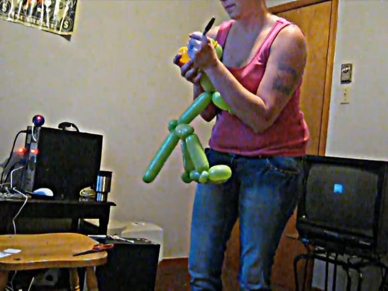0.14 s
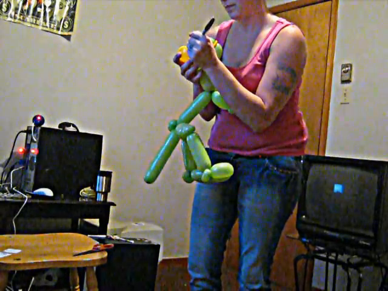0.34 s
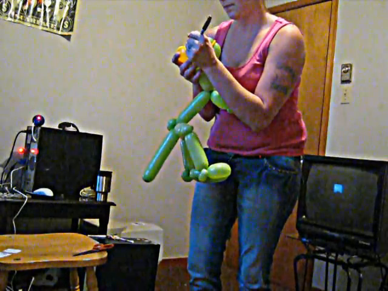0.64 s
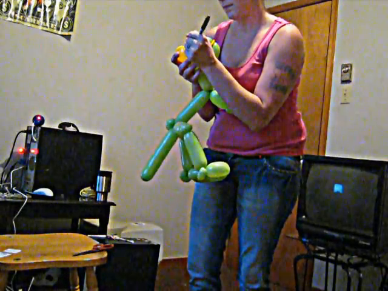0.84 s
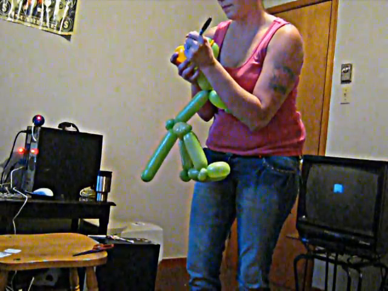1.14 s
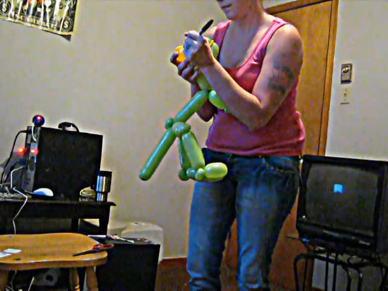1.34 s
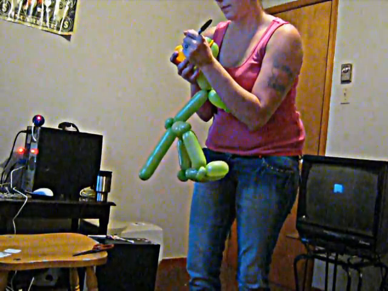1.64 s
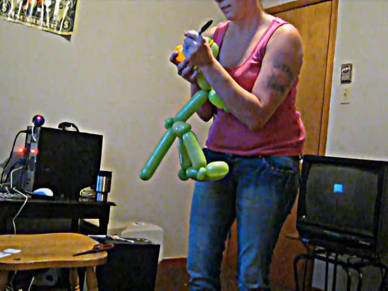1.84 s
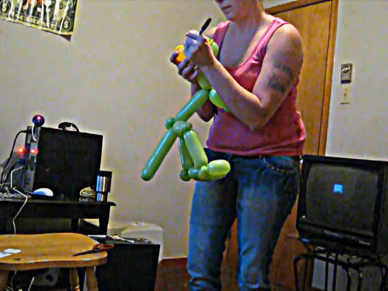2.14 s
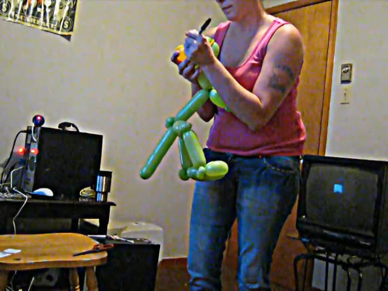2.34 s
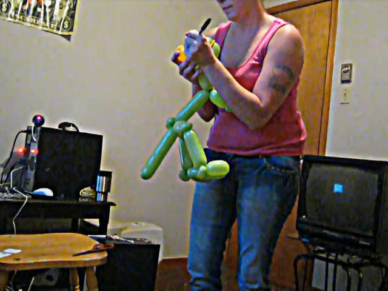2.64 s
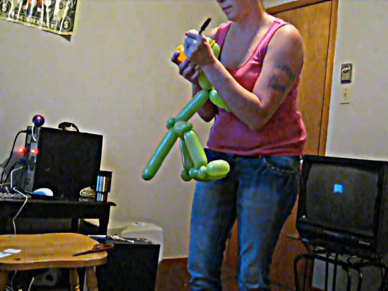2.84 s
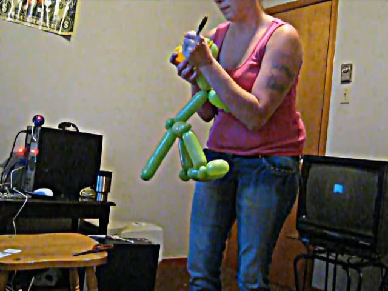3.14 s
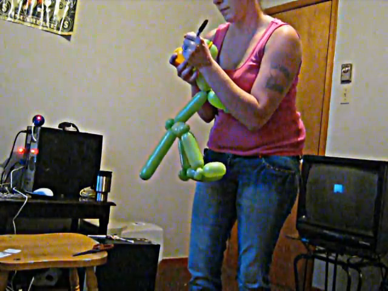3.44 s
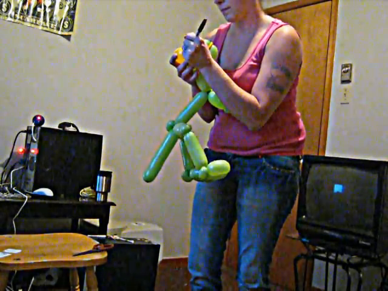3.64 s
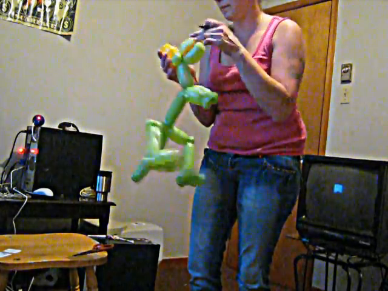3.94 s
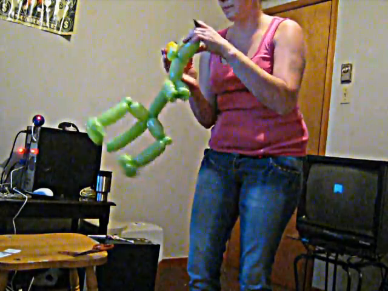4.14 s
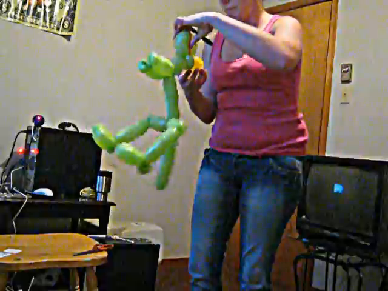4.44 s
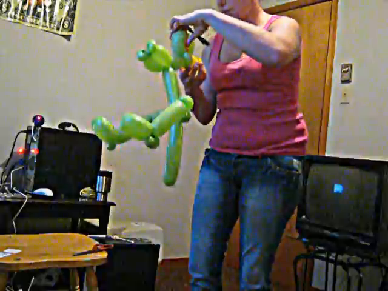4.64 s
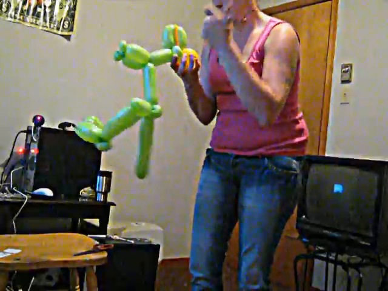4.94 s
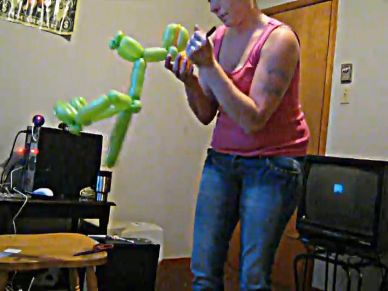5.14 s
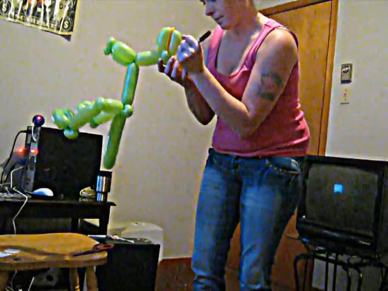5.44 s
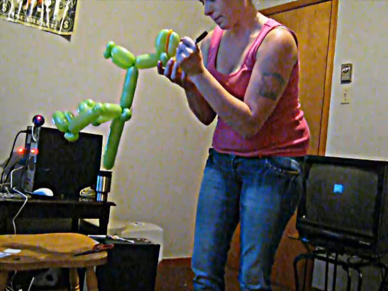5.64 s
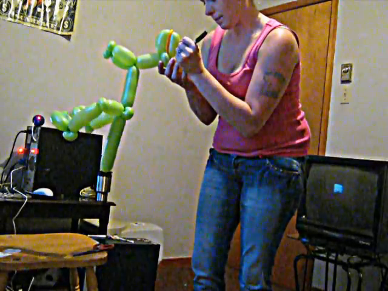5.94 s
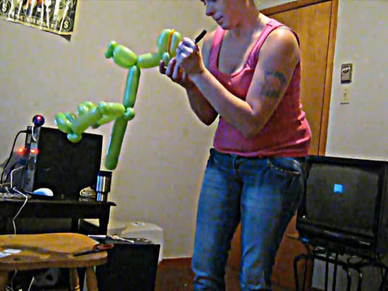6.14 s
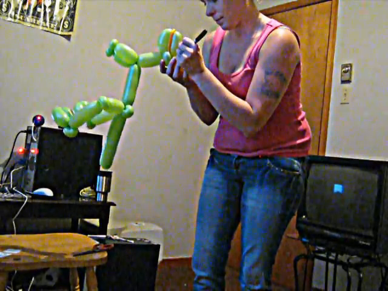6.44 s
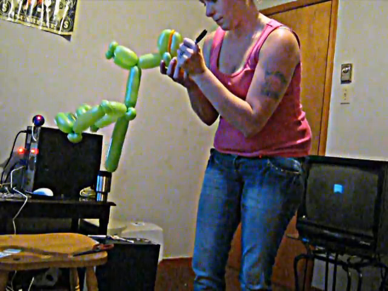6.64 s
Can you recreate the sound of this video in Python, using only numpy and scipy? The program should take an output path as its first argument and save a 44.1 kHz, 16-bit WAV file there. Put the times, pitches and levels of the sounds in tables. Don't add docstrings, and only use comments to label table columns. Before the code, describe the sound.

In a small living room, a felt nib rubs tight latex in fast back-and-forth strokes, about ten a second, mixing hoarse scrapes with bright squeaks and swooping chirps. Then hands turn the balloon with dry creaks, snaps and ticks. A nail flick ends it; after a quiet gap comes one hard pen knock and a short low squeak. Slightly distant, dull, hissy camera microphone over a faint drone.

```python
import sys
import numpy as np
from scipy import signal
from scipy.io import wavfile
from scipy.ndimage import uniform_filter1d

SR = 44100
rng = np.random.default_rng(int(sys.argv[2]) if len(sys.argv) > 2 else 0)


def gain_from_db(level_db):
    decades = np.asarray(level_db, float) / 20
    return 10 ** decades


def generate_wav(signal):
    frames = np.transpose(np.atleast_2d(signal))
    scaled = np.clip(frames, -1, 1) * 32767
    pcm = np.round(scaled).astype(np.int16)
    wavfile.write(sys.argv[1], SR, pcm)


N = 299638

# (frequency [Hz], density [dB per Hz])
RUB_SPECTRUM = [(410, -24.5), (700, -2.5), (1270, -0.5), (1780, 1), (1950, -2.5), (2710, -1), (3350, -4),
                (4010, -3), (6060, -18.5), (6840, -26), (7710, -47), (10000, -91.5), (17000, -120)]


def evened(x):
    return x / np.sqrt(np.mean(x ** 2) + 1e-20)


def read(points, hz):
    f, value = np.transpose(points)
    return np.interp(np.log(hz + 1), np.log(f + 1), value)


def add(mix, s, sound):
    at = round(s * SR)
    part = mix[max(at, 0):][:len(sound) + min(at, 0)]
    part += sound[max(-at, 0):][:len(part)]


def controls(rows):
    s, *columns = np.transpose(rows)
    t = np.arange(s[0], s[-1], 1 / SR)
    return [np.interp(t, s, c) for c in columns]


def wander(count, hz):
    chance = rng.standard_normal(max(count, 15000))[:count]
    smooth = uniform_filter1d(chance, int(SR / hz))
    return evened(uniform_filter1d(smooth, int(SR / hz / 2)))


def colour(x, points):
    level_db = read(points, abs(np.fft.fftfreq(4096, 1 / SR)))
    gain = np.log(gain_from_db(np.maximum(level_db, -100)))
    taps = np.fft.ifft(np.exp(gain - 1j * signal.hilbert(gain).imag)).real[:2048]
    return signal.oaconvolve(x, taps)[:len(x)]


def resonate(x, hz, width):
    turn = np.exp(2j * np.pi * np.cumsum(hz * np.ones(len(x))) / SR)
    r = np.exp(-np.pi * width / SR)
    return 2 * (turn * signal.lfilter([1 - r], [1, -r], x / turn)).real


def pressure(strokes, rise_s, fade_db, swell_at):
    lift_s = 0.015
    t = np.arange(N) / SR
    rub, air = np.zeros(N), np.zeros(N)
    for start, length, db, air_db in strokes:
        u = t[:round((length + 6 * lift_s) * SR)]
        release = np.exp(-(np.maximum(u - length, 0) / lift_s) ** 2)
        shape = np.tanh((u / rise_s) ** 0.71) * release
        add(rub, start, shape * gain_from_db(db + fade_db * u / length))
        add(air, start, shape * gain_from_db(db + air_db - 34 * (u / length - swell_at) ** 2))
    return rub, air


def scrape(singing):
    # (start [s], length [s], level [dB], air mode against that level [dB])
    nib_first = [(-.05, 0.09, -18.5, -23), (0.105, 0.054, -35.5, -2.5), (0.204, 0.1, -21, -11),
                 (0.319, 0.059, -19, -10), (0.445, 0.057, -26.5, -2), (0.546, 0.068, -21.5, -9.5),
                 (0.646, 0.071, -25, -4), (0.729, 0.093, -20.5, -13), (0.842, 0.097, -23.5, -6.5),
                 (0.92, 0.2, -23.5, -14), (1.033, 0.13, -23.5, -15), (1.211, 0.094, -17, -14),
                 (1.258, 0.12, -22.5, -21), (1.349, 0.09, -24, -23), (1.452, 0.062, -26.5, -15)]
    nib_second = [(1.789, 0.071, -23, -12), (1.87, 0.09, -21.5, -17), (2.01, 0.19, -28, -16),
                  (2.185, 0.055, -26, -24.5), (2.259, 0.087, -27, -2.5), (2.382, 0.085, -18, -12.5),
                  (2.479, 0.087, -25.5, -16), (2.586, 0.14, -21, -11), (2.704, 0.085, -26, -18),
                  (2.815, 0.13, -17.5, -19), (2.913, 0.19, -26.5, -13), (3.032, 0.18, -35, -5.5),
                  (3.23, 0.11, -22, -10.5), (3.352, 0.11, -16, -12.5), (3.503, 0.065, -21, -22),
                  (3.626, 0.034, -22.5, -2)]
    hands = [(3.701, 0.098, -23.5, -8.5), (3.837, 0.073, -18.5, -7), (3.914, 0.091, -20.5, -4.5),
             (4.02, 0.097, -32.5, -4), (4.124, 0.093, -26, -4.5), (4.218, 0.085, -27.5, -4),
             (4.328, 0.088, -27, 0.5), (4.425, 0.044, -31.5, 7.5), (4.512, 0.064, -20.5, -7),
             (4.616, 0.051, -24.5, -2.5), (4.672, 0.069, -22.5, -4), (4.77, 0.046, -27, -2.5),
             (4.809, 0.088, -19.5, -7.5), (4.901, 0.1, -22, -5)]
    regrip = [(5.021, 0.049, -24.5, -17), (5.137, 0.052, -31, -4.5), (5.196, 0.068, -24.5, -10.5),
              (5.274, 0.079, -23, -14), (5.379, 0.042, -29.5, -3.5), (5.449, 0.036, -30, -7)]
    # (rise [s], fade over a stroke [dB], place of the air swell in the stroke [0-1])
    pushes = [(0.0067, -5.5, 0.7), (0.0083, -5.5, 0.65), (0.012, -8.5, 0.46), (.014, -8.5, 0.33)]
    # (slip rate [1/s], unevenness [0-1], size spread [dB], air mode width [Hz], tilt [dB per octave])
    grips = [(649, .22, 8.5, 195, 0.8), (680, .22, 3.5, 240, -0.35), (520, .36, 3, 390, 1.2),
             (560, .4, 6, 340, 3)]
    # (time [s], frequency [Hz])
    squeeze = [(0, 707), (1.6, 678), (1.8, 652), (3.65, 649), (3.76, 602), (3.98, 588), (4.07, 456),
               (4.2, 560), (4.3, 650), (4.35, 790), (4.44, 713), (4.55, 604), (4.7, 583), (4.85, 560),
               (4.95, 660), (5.16, 680), (5.5, 707)]
    out = np.zeros(N)
    for strokes, push, grip in zip((nib_first, nib_second, hands, regrip), pushes, grips):
        slip_hz, uneven, spread_db, width, tilt_db = grip
        first = max(round(strokes[0][0] * SR), 0)
        rub, swell = (gain[first:first + 2 * SR] for gain in pressure(strokes, *push))
        count = len(rub)
        turns = np.cumsum(slip_hz * np.exp(uneven * wander(count, hz=199.55))) / SR
        size_db = spread_db * np.clip(rng.standard_normal(count), -2, 1.5)
        slips = (np.diff(np.floor(turns), prepend=0) > 0) * gain_from_db(size_db)
        drive = evened(slips - slips.mean()) + .4 * rng.standard_normal(count)
        tilted = [(hz, db + tilt_db * np.log2(min(hz, 4000) / 2000)) for hz, db in RUB_SPECTRUM]
        skin = evened(colour(drive, tilted))
        air_hz = np.interp((first + np.arange(count)) / SR, *np.transpose(squeeze))
        air = evened(resonate(resonate(drive, air_hz, width), air_hz, width))
        yielding = gain_from_db(-12 * singing[first:first + 2 * SR] + 1.65 * wander(count, hz=60))
        add(out, first / SR, gain_from_db(-3.5) * (yielding * rub * skin + yielding ** 0.71 * swell * air))
    return out


def stroke(start, length, db, from_hz, to_hz, rising, entry_db, fade_db, odd_db, tilt_db):
    rising = np.clip(rising, .02, .98)
    rows = []
    for share, drop_db in ((0, entry_db), (rising, 0), (1, fade_db)):
        arch = 1 + 0.013 * (drop_db == 0)
        hz = (from_hz + share * (to_hz - from_hz)) * arch
        dulled_db = tilt_db + 0.45 * (db + drop_db + 22.5)
        rows.append((start + share * length, db + drop_db, hz, odd_db * gain_from_db(0.11 * drop_db), dulled_db))
    return rows


def squeak(rows, jitter, flutter_db, lowest_db=0):
    # (frequency [Hz], level [dB])
    skin = [(210, -34), (350, -20), (713, -6.5), (1670, 0.5), (1860, -3.5), (2600, -3), (2810, -2.5),
            (3120, -4.5), (4040, -6.5), (4840, -13), (5370, -18), (7320, -38.5), (7710, -45), (10000, -56),
            (17000, -120)]
    db, hz, odd_db, tilt_db = controls(rows)
    hz = uniform_filter1d(hz, size=450, mode="nearest")
    count = len(hz)
    tremble = wander(count, hz=400) + 0.45 * wander(count, hz=46.0)
    turns = np.cumsum(hz * (1 + jitter * tremble)) / SR
    out = np.zeros(count)
    for k in range(1, 21):
        level_db = read(skin, k * hz) + (k == 1) * lowest_db + k % 2 * odd_db
        level_db = level_db + tilt_db * np.log2(k * hz / 1600)
        flutter = flutter_db * (k * hz / 1600) ** 0.33 * wander(count, hz=140)
        out += gain_from_db(level_db + flutter) * np.cos(2 * np.pi * k * turns - 0.296 * k ** 2)
    steady = out / np.sqrt(uniform_filter1d(out ** 2, size=1300) + 1e-20)
    stutter_db = 85 * jitter * wander(count, hz=70)
    return gain_from_db(db + stutter_db) * steady * signal.windows.tukey(count, .22)


def short_squeaks(out, singing):
    # (start [s], length [s], level [dB], slip or pair rate from [Hz], to [Hz])
    paired_rows = [(-.04, .085, -19.5, 851, 815), (.298, .09, -30, 1378, 1370),
                   (2.225, .075, -28, 1105, 1095), (0.592, 0.05, -24, 798, 773)]
    even_rows = [(.99, .052, -25.5, 515, 494), (1.378, 0.054, -22, 480, 475),
                 (1.456, 0.066, -26.5, 488, 483), (1.78, 0.097, -24, 489, 467),
                 (3.012, 0.066, -24.5, 483.5, 484)]
    hoarse_rows = [(1.267, 0.065, -20, 646, 606), (1.613, 0.054, -34, 400, 390),
                   (1.679, 0.062, -41, 395, 390), (3.579, .04, -33, 696, 667),
                   (4.333, .04, -27.5, 582, 560), (4.14, 0.045, -25, 490, 500)]
    finger_rows = [
        (5.031, 0.037, -23.5, 443.5, 417),
    ]
    # (share of length rising [0-1], entry [dB], fade [dB], odd partials [dB], tilt [dB per octave])
    paired_grip = (-0.33, -11.5, -10.5, -24.5, -3.5)
    even_grip = (0.7, -3.5, -7.5, -3.5, -2)
    hoarse_grip = (0.6, -5.5, -5.5, -1, -1.5)
    finger_grip = (0.6, -5.5, -12.5, -6.5, 7)
    # (time [s], level [dB], pair rate [Hz])
    bends = [
        [(.26, -22.5, 768), (.28, -19.5, 817), (.294, -14, 825), (.312, -24, 851), (.336, -31, 830),
         (.366, -29, 826), (.395, -35, 856)],
        [(.488, -26.5, 791), (.502, -18, 775), (.518, -15.5, 750), (.536, -23, 791), (.555, -25, 782),
         (.58, -28, 778)],
        [(.7, -33, 715), (.714, -18, 706.5), (.733, -15, 705), (.75, -22, 693), (.775, -26, 662),
         (.8, -28, 665)],
        [(2.19, -26, 749), (2.212, -21, 839), (2.232, -23.5, 804), (2.25, -23, 849), (2.272, -21, 778),
         (2.295, -29, 796), (2.32, -31, 807), (2.345, -29, 796)],
        [(2.36, -34.5, 785), (2.385, -24, 805), (2.399, -26, 795), (2.403, -13, 802), (2.41, -12, 803),
         (2.418, -18, 771), (2.436, -30, 770)],
        [(2.485, -23, 756), (2.505, -22.5, 772), (2.517, -18, 822), (2.54, -31.5, 847)],
        [(2.69, -29, 633.6), (2.715, -25.5, 746), (2.735, -20.5, 823), (2.748, -29.5, 830), (2.775, -38, 850)],
    ]
    # (odd partials [dB], tilt at entry [dB per octave], tilt at the end [dB per octave])
    bend_grips = [(-23.5, -0.5, -5.5), (-15, 4, 2), (-20, 2, -2.5), (-28, -2, -8), (-20, -3.5, -2.5),
                  (-19, -4, -4), (-13, -4, -3)]
    paired = [stroke(*row, *paired_grip) for row in paired_rows]
    for bend, (odd_db, *tilts) in zip(bends, bend_grips):
        tilt_line = np.linspace(*tilts, len(bend))
        paired.append([(*point, odd_db, tilt_db) for point, tilt_db in zip(bend, tilt_line)])
    even = [stroke(*row, *even_grip) for row in even_rows]
    hoarse = [stroke(*row, *hoarse_grip) for row in hoarse_rows]
    hoarse += [stroke(*row, *finger_grip) for row in finger_rows]
    for kind, jitter, flutter_db, db in ((paired, .016, 3, -2.5), (even, .015, 2.5, -2.5), (hoarse, .033, 4, -4)):
        for rows in kind:
            sound = squeak(rows, jitter, flutter_db, lowest_db=-4)
            add(out, rows[0][0], gain_from_db(db) * sound)
            add(singing, rows[0][0], gain_from_db(db) * signal.windows.tukey(len(sound), .15))


def glides(out, singing):
    # (time [s], level [dB], slip rate [Hz])
    long_strokes = [
        [(.895, -26, 727.7), (.925, -20, 763.6), (.96, -22.5, 754), (.985, -36, 750)],
        [(1.2, -23, 489), (1.23, -19.5, 498), (1.265, -20, 507)],
        [(1.87, -9.5, 498), (1.915, -18, 587), (1.973, -21, 532.7), (2.025, -19.5, 596), (2.097, -23, 794),
         (2.125, -22, 790), (2.165, -29, 745)],
        [(3.05, -18, 591.7), (3.119, -19.5, 702), (3.179, -21, 752.4), (3.207, -27, 680), (3.25, -14.5, 619)],
        [(6.615, -39, 501), (6.638, -36, 472.3), (6.668, -26.5, 448.6), (6.688, -22, 487),
         (6.705, -20.5, 484.8), (6.745, -25.5, 486.4)],
        [(6.735, -15, 444), (6.755, -25, 413), (6.84, -15, 414)],
    ]
    # (odd partials [dB], tilt [dB per octave], lowest partial [dB], tremble [share of rate])
    glide_grips = [(-3, 2.5, 5, .009), (-0.2, 1.5, -2, .012), (3.5, -0.5, -2, .021), (2, -1, 1.5, .014),
                   (-2.5, 2, 11, .016), (-5, -1.5, 3, .018)]
    for glide, (odd_db, tilt_db, lowest_db, jitter) in zip(long_strokes, glide_grips):
        rows = [(s, db, hz, odd_db, tilt_db + 0.17 * (db + 22.0)) for s, db, hz in glide]
        sound = squeak(rows, jitter, 2.4, lowest_db)
        add(out, glide[0][0], gain_from_db(-2.5) * sound)
        add(singing, glide[0][0], 0.71 * signal.windows.tukey(len(sound), .15))


def chirps(out, singing):
    # (time [s], level [dB], slip rate [Hz])
    swoops = [
        [(1.0, -30.5, 745), (1.03, -22, 734.6), (1.052, -24, 719.5), (1.07, -18, 563), (1.095, -21.5, 560),
         (1.112, -22, 651), (1.135, -23.5, 659), (1.16, -33.5, 656), (1.195, -29, 702)],
        [(2.59, -26.5, 698.4), (2.617, -22, 705.6), (2.633, -14.5, 697), (2.648, -22, 572.5), (2.67, -29, 560)],
        [(2.805, -24, 600.7), (2.825, -27, 743.6), (2.84, -20, 661.4), (2.853, -18, 610.4), (2.875, -21.5, 565),
         (2.895, -28, 656), (2.915, -22.5, 670)],
        [(2.905, -27, 712), (2.925, -24, 746), (2.952, -28, 733), (3.0, -30.5, 730)],
        [(3.295, -24.5, 680), (3.312, -18.5, 666.5), (3.338, -32, 651), (3.355, -21.5, 588.6),
         (3.366, -31, 643), (3.378, -18.5, 737), (3.4, -24.5, 715.5), (3.425, -23, 615), (3.46, -27.5, 520)],
        [(3.485, -28, 695.5), (3.51, -23.5, 750), (3.53, -23, 680), (3.553, -21, 646.6), (3.57, -26, 600)],
        [(3.62, -30, 733), (3.63, -22.5, 730), (3.645, -28, 713), (3.66, -36, 690)],
        [(3.685, -30, 648.6), (3.705, -24, 688.4), (3.725, -30, 705), (3.75, -24, 633)],
    ]
    # (odd partials [dB], tilt [dB per octave], lowest partial [dB])
    chirp_grips = [(-3, -3.5, 0.5), (1, 1, 2), (8.5, -3, -1.5), (-6, -7.5, -7), (2, -3.5, -2.5),
                   (1.5, -4.5, -7.5), (-0.5, -5, -7), (2.5, -5.5, -5)]
    for chirp, (odd_db, tilt_db, lowest_db) in zip(swoops, chirp_grips):
        sound = squeak([(*point, odd_db, tilt_db) for point in chirp], 0.0167, 4.3, lowest_db)
        add(out, chirp[0][0], gain_from_db(-3.0) * sound)
        add(singing, chirp[0][0], 0.5 * signal.windows.tukey(len(sound), .15))


def all_squeaks():
    out, singing = np.zeros(N), np.zeros(N)
    short_squeaks(out, singing)
    glides(out, singing)
    chirps(out, singing)
    return out, singing


def room(x):
    # (frequency [Hz], t60 [s])
    decay = [(300, .35), (800, .47), (2100, .47), (5500, .38)]
    near = np.zeros(1400)
    near[rng.integers(60, 1400, 8)] = rng.choice([-1., 1.], 8) * rng.uniform(0.084, 0.2, 8)
    out = signal.oaconvolve(x, near)[:N]
    turn = np.arange(N) / SR * 1.697
    for k in range(3):
        taps = np.zeros(SR)
        at = np.arange(300, SR - 20, 20) + rng.integers(0, 20, (SR - 301) // 20)
        taps[at] = rng.choice([-1., 1.], len(at))
        hz, t, z = signal.stft(taps, SR, nperseg=256)
        dying = gain_from_db(-60 * t / read(decay, hz)[:, None])
        tail = signal.istft(z * dying, SR, nperseg=256)[1]
        share = np.sqrt(2 / 3) * np.cos(np.pi * (turn + k / 3))
        out += gain_from_db(-3.5) * signal.fftconvolve(x * share, tail / np.linalg.norm(tail))[:N]
    return out


def hiss():
    # (frequency [Hz], density [dB per Hz])
    hiss_spectrum = [(12, -40), (20, -10), (27, -18), (147, -19), (184, -16), (310, -17), (342, -15.5),
                     (510, -12), (564, -9), (671, -16.5), (741, -15.5), (2110, -22.5), (4030, -21),
                     (6010, -28), (7710, -51.5), (10000, -102.5), (17000, -120)]
    return gain_from_db(-47.5) * evened(colour(rng.standard_normal(N), hiss_spectrum))


def drone():
    # (frequency [Hz], width [Hz], level [dB])
    hum = [(200.3, 14, 0), (226.2, 23, 2), (255, 180, -1.5), (146, 28, -8)]
    # (centre [s], level [dB])
    swells = [(.12, -49), (.38, -51.5), (.8, -54.5), (1.199, -63), (1.74, -48), (2.65, -53.5), (3.04, -53),
              (3.68, -61.5), (3.95, -66), (4.25, -62), (4.4, -41.5), (4.95, -51)]
    fuzz = sum(gain_from_db(db) * evened(resonate(rng.standard_normal(N), hz, width)) for hz, width, db in hum)
    t = np.arange(N) / SR
    level = gain_from_db(-53 - 0.89 * t)
    level += sum(gain_from_db(db) * np.exp(-((t - s) / .12) ** 2) for s, db in swells)
    return gain_from_db(-4.0) * level * evened(fuzz)


def reversals():
    # (time [s], level [dB], pair rate from [Hz], to [Hz], length [s])
    turn_backs = [(.206, -26.5, 1014, 520, 0.07), (0.433, -27.5, 844, 520, 0.051),
                  (0.638, -28, 803, 557.5, 0.042), (0.838, -23, 850, 502.6, 0.066),
                  (0.944, -30, 623, 488, 0.06), (2.269, -31, 787, 520, 0.057),
                  (2.415, -30, 783, 599.5, 0.056), (3.245, -36, 680, 554, 0.047),
                  (3.732, -29, 640, 456, 0.045)]
    out = np.zeros(N)
    for s, db, high_hz, low_hz, length in turn_backs:
        rows = [(0, db, high_hz, -20, -.7),
                (0.44 * length, db, 1.15 * low_hz, -10, .7),
                (length, db - 0.5, low_hz, -.6, -1.5)]
        add(out, s, squeak(rows, jitter=0.0455, flutter_db=3.0))
    return out


def jolts():
    # (time [s], peak [dB])
    steps = [(0.275, -44), (0.2855, -44), (0.5204, -38.5), (0.7386, -42), (0.8646, -37), (0.9584, -44),
             (1.0955, -41), (1.2316, -41), (1.9007, -36.5), (2.4056, -37), (2.414, -40), (2.6335, -42),
             (2.6486, -44), (3.0797, -42), (3.4031, -45), (3.7225, -31.5), (3.869, -36), (3.9975, -33),
             (4.5416, -35), (4.636, -40), (4.6865, -44), (4.7074, -43), (5.22, -38), (6.167, -35.5),
             (6.706, -39)]
    out = np.zeros(N)
    u = np.arange(1200) / SR / .002
    for s, db in steps:
        add(out, s, gain_from_db(db) * u * np.exp(1 - u))
    return out


def snaps():
    # (time [s], peak [dB], ring [Hz])
    grabs = [(3.721, -17, 1880), (3.8254, -16.5, 2800), (3.9967, -20, 2920), (4.2126, -20.5, 4270),
             (4.3266, -28, 1600), (4.3326, -20, 1160), (4.4332, -20.5, 1150), (4.532, -15, 2300),
             (4.633, -13, 2770), (4.6863, -13, 2640), (4.814, -17.5, 1820), (4.838, -20, 3840),
             (5.218, -19, 2900), (5.3902, -19, 3980)]
    out, t = np.zeros(N), np.arange(4000) / SR
    for s, db, hz in grabs:
        burst = rng.standard_normal(len(t)) * gain_from_db(-60 * t / 0.053) * np.tanh(t / 0.001)
        crack = colour(burst, RUB_SPECTRUM)
        add(out, s, gain_from_db(db + 5.5) * (crack + 0.38 * resonate(crack, hz, 1000)))
    return out


def ticks():
    # (time [s], peak [dB], ring [Hz])
    hard_slips = [(3.825, -19, 2750), (3.9084, -15, 1600), (3.9983, -12, 2900), (4.2397, -16.5, 1670),
                  (4.3242, -20, 1620), (4.432, -27, 1160), (4.5122, -15.5, 3000), (4.517, -23, 1920),
                  (4.5312, -15, 2280), (4.5381, -10.5, 2500), (4.9362, -11, 3620), (4.953, -21, 2600),
                  (5.2001, -28, 1130), (5.225, -25, 1850), (5.3869, -30, 1980)]
    out, click = np.zeros(N), np.eye(1, 600)[0]
    for s, db, hz in hard_slips:
        ring = colour(resonate(click, hz, width=2200), RUB_SPECTRUM)
        add(out, s, gain_from_db(db) * ring / abs(ring).max())
    return out


def nail_flick():
    # (time [s], peak [dB], t60 [s], frequency [Hz], width [Hz])
    flick = (5.4607, -16, .008, 3000, 1700)
    s, db, t60, hz, width = flick
    out, t = np.zeros(N), np.arange(4000) / SR
    burst = rng.standard_normal(len(t)) * 1000 ** (-t / t60)
    ring = resonate(resonate(burst, hz, width), hz, width)
    add(out, s, gain_from_db(db) * ring / abs(ring).max())
    return out


def barrel_taps():
    # (time [s], peak [dB], t60 [s])
    hits = [
        (6.1637, -8.5, 0.011),
        (6.1695, -16, 0.05),
    ]
    # (frequency [Hz], width [Hz], level [dB])
    barrel = [(750, 500, -11), (1750, 500, 0.5), (2700, 700, -4.5), (3450, 600, 0.5), (4430, 650, -6),
              (5300, 600, -19)]
    out, t = np.zeros(N), np.arange(4000) / SR
    for s, db, t60 in hits:
        crack = rng.standard_normal(len(t)) * gain_from_db(-60 * t / t60) * np.tanh(t / 0.00035)
        ring = np.zeros(len(t))
        for hz, width, mode_db in barrel:
            ring += gain_from_db(mode_db) * resonate(resonate(crack, hz, width), hz, width)
        ring = colour(ring, [(5200, -2), (7500, -12)])
        add(out, s, gain_from_db(db) * ring / abs(ring).max())
    return out


def scene():
    squeaks, singing = all_squeaks()
    balloon = squeaks + scrape(singing) + reversals()
    balloon += snaps() + ticks() + nail_flick() + barrel_taps()
    background = hiss() + drone() + jolts()
    return (gain_from_db(-0.5) * (balloon + room(balloon)) + background)[None]


def top_cut(x):
    return signal.sosfilt(signal.butter(12, 15700, fs=SR, output="sos"), x)


def record(dry):
    squeezed = 0.44 * np.tanh(dry / .45)
    sloped = signal.sosfilt(signal.butter(4, 7000, fs=SR, output="sos"), squeezed)
    steep = signal.firwin(201, 7600, window=("kaiser", 10), fs=SR)
    limited = signal.oaconvolve(sloped, steep[None], "same")
    grit = gain_from_db(-51.0) * limited ** 2 + gain_from_db(-87.5) * rng.standard_normal(dry.shape)
    mix = limited + grit - .0057
    return top_cut(mix)


dry = scene()
out = record(dry)
generate_wav(out)
```